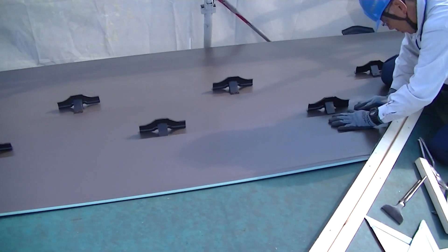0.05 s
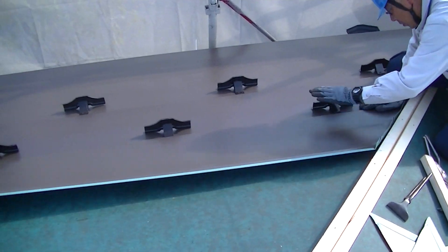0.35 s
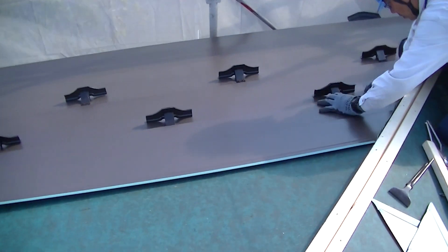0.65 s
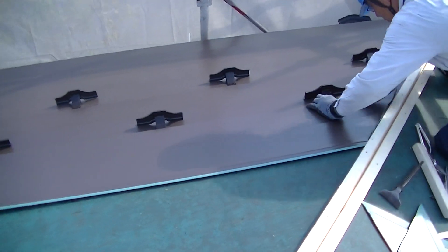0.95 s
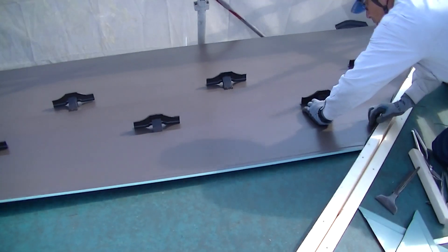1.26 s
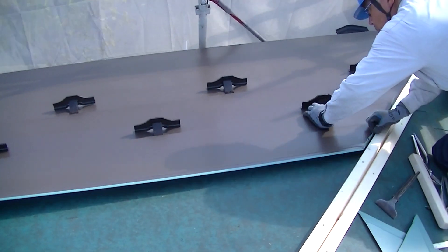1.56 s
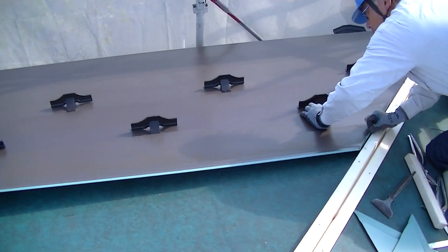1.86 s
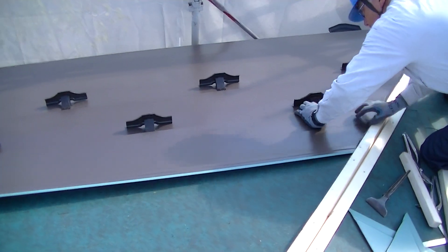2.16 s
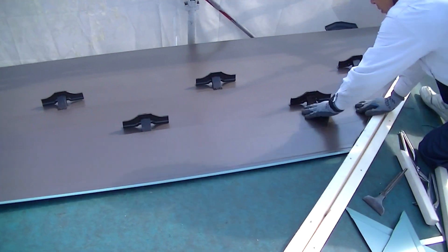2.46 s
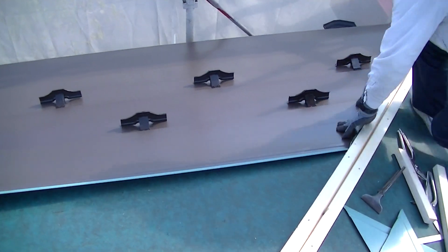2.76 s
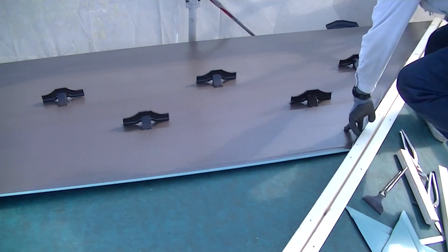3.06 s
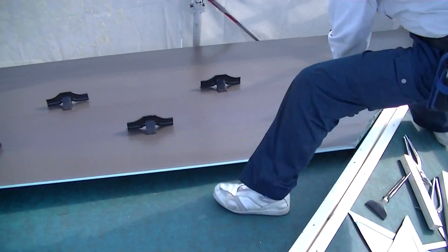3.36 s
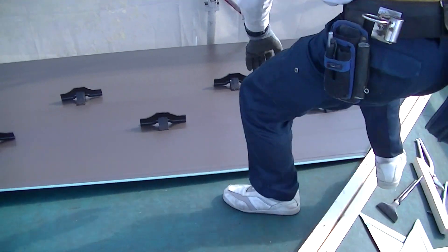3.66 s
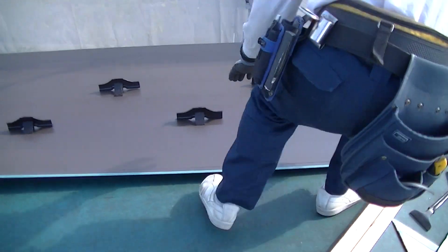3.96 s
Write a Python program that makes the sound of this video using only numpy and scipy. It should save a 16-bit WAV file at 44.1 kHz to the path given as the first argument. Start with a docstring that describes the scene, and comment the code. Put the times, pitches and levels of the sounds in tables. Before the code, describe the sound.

A metal roofing sheet snaps into place twice with sharp, shuddering bangs, scrapes and ticks as it is dragged, then bangs a third time. It clatters again before footsteps and jingling tools, close by outdoors in faint wind.

```python
"""A long metal roofing sheet is pushed into place on a roof, close by, in faint wind.
A knee thuds on the deck and the sheet snaps home twice: each time its edge clacks, then the whole sheet
shudders and rings out. Dragged over the felt, it drones, scrapes and ticks, squeaks and bows, and snaps
home a third time. One more push sets it clattering; at the end the worker steps across, tools jingling."""
import sys
import numpy as np
from scipy import signal
from scipy.fft import rfft, irfft, next_fast_len
from scipy.io import wavfile
from scipy.ndimage import map_coordinates

SR = 44100
rng = np.random.default_rng(int(sys.argv[2]) if len(sys.argv) > 2 else 0)


def int16_out(signal):
    """Quantize to a 16-bit WAV file."""
    q = np.round(np.clip(np.atleast_2d(signal).T, -1, 1) * 32767)
    wavfile.write(sys.argv[1], SR, q.astype(np.int16))


N = 176400

# open-air bed and wind rumble: frequency_hz, level_db
AIR_EQ = [(25, -42), (70, -25), (140, -11), (250, -5), (480, 2), (1000, -4), (2500, -8.5), (4600, -8.5),
          (6000, -14.5), (9500, -19), (16000, -35)]
WIND_EQ = [(20, -8), (70, -6.5), (140, 3), (190, 3.5), (300, -17), (1000, -15), (16000, -70)]
# knees and feet on the deck: start_s, level_db, pitch_hz
THUDS = [(0.024, -40.5, 177), (0.578, -44, 191), (0.848, -48.5, 170), (2.372, -58, 58), (3.323, -56, 171),
         (3.355, -60, 55), (3.938, -52.5, 172)]
# the sheet shudders: start_s, level_db, swell_s, decay_factor, tilt_db_per_octave, held_gain
SHUDDERS = [(.032, -15, 0.051, 0.83, 0.9, 0.29), (.452, -12, 0.096, 0.97, -1.6, 0.28),
            (2.370, -12, 0.053, 0.85, -0.76, 0.22)]
# tone of a shudder: frequency_hz, level_db
SHUDDER_EQ = [(40, -54), (120, -46), (250, -17), (420, -7), (600, -4), (900, -3), (1350, -4.5), (2000, -2),
              (2800, -10), (3700, -10.5), (4900, -6.5), (5700, -13.5), (9000, -11.5), (12500, -22),
              (16000, -33)]
# its tail, before each shudder's decay_factor: frequency_hz, t60_s
SHUDDER_DECAY = [(100, 0.28), (450, 1), (1200, 0.88), (2500, 0.67), (5000, 0.42), (9000, 0.37),
                 (15000, 0.31)]
# resonances of the sheet and of its edge: centre_hz, width_hz, boost_db
SHEET_MODES = [(424, 65, 0.5), (504, 14, 3), (804, 45, 2.5), (949, 21, 6.5), (990, 7.9, 4), (1133, 24, 6.5),
               (1247, 30, 4.5), (1321, 122, 9), (1511, 15, 6), (2077, 34, 4), (3200, 670, 4.5),
               (4246, 140, 7), (4975, 120, 6)]
EDGE_MODES = [(1734, 150, 8), (3120, 180, 4.5), (4550, 400, 5.5)]
# hard hits of the edge: start_s, level_db, pitch_hz, t60_s, boost_at_pitch_db
CLACKS = [(.0320, -16.5, 9400, 0.041, 13), (0.037, -9, 1020, 0.013, 36), (0.0426, -19, 4670, 0.033, 12),
          (0.4518, -13, 3400, 0.018, 0), (0.4535, -8, 1880, 0.014, 19), (.4545, -2, 4450, 0.0064, 14),
          (0.454, -12, 10500, .006, 25), (0.4984, -24.5, 2340, 0.23, 20), (1.8179, -18.5, 1670, 0.041, 25),
          (1.822, -28, 4300, 0.036, 18), (2.369, -28, 5030, 0.03, 4), (2.3735, -3, 5360, 0.0084, 23),
          (2.3743, -11.5, 10600, .008, 21), (2.381, -14, 5030, 0.026, 2), (2.761, -16.5, 4600, 0.025, 28),
          (2.806, -22, 4440, 0.032, 15), (2.8543, -18, 4400, 0.029, 9), (2.8917, -26, 3110, 0.025, 8),
          (3.3268, -20.5, 1500, 0.0092, 16), (3.3636, -15.5, 1610, 0.015, 22),
          (3.3638, -21.5, 3140, .011, 20), (3.3665, -32, 900, 0.026, 11), (3.6004, -24.5, 4270, 0.058, 12),
          (3.612, -29.5, 4600, 0.065, 5)]
# small catches of the edge and taps of tools: start_s, level_db, pitch_hz
TICKS = [(0.328, -38, 4370), (0.373, -35.5, 4600), (0.875, -40.5, 4870), (1.161, -37.5, 11000),
         (1.8623, -37, 11000), (1.1886, -33, 3760), (1.407, -35.5, 3480), (1.4568, -37.5, 3770),
         (1.7162, -39, 4000), (1.735, -41, 6260), (1.7885, -35.5, 6240), (1.8763, -28.5, 4500),
         (1.902, -28, 4320), (1.938, -34, 11000), (2.138, -37, 6470), (2.0345, -37, 5200),
         (2.041, -34, 11000), (2.157, -31, 3720), (2.2673, -35, 3840), (2.012, -33.5, 10500),
         (2.6344, -32, 4600), (2.702, -28.5, 4500), (2.712, -28.5, 11000), (3.2194, -33, 4150),
         (3.5753, -39, 4350), (3.616, -35, 9500), (3.6888, -37, 5200), (3.8143, -44, 3330),
         (3.4192, -33.5, 4550), (3.4886, -34.5, 4400), (3.6648, -31.5, 4400)]
# tone of clacks and ticks: frequency_hz, level_db
CONTACT_EQ = [(50, -59), (250, -10), (500, 5), (1000, 4), (2700, -1), (5000, -3), (5800, -11),
              (9000, -10.5), (13000, -21.5), (16000, -31)]
# fader moves, one list for each push: time_s, drone_db, scrape_db
PUSHES = [
    [(0.22, -47.5, -40), (0.334, -29.5, -34), (0.386, -33.5, -36.5), (0.445, -30.5, -45)],
    [(0.6, -37, -25.5), (0.814, -41.5, -42), (0.874, -65, -44.5), (0.9, -56, -59)],
    [(1.18, -60, -72), (1.192, -49, -40), (1.252, -42, -48), (1.336, -41, -45), (1.354, -41.5, -57),
     (1.41, -37, -41.5), (1.564, -40.5, -50.5), (1.576, -35.5, -43.5), (1.698, -45, -50),
     (1.718, -33, -35.5), (1.742, -33, -45.5), (1.8, -35, -50), (1.82, -35, -18.5), (1.85, -30.5, -29.5),
     (2.082, -32.5, -37.5), (2.36, -36, -40)],
    [(2.6, -41, -35), (2.65, -45, -57), (2.692, -36, -49), (2.716, -29, -30), (2.802, -28.5, -22.5),
     (3.134, -41.5, -34.5), (3.216, -48.5, -47), (3.286, -40.5, -44), (3.368, -31, -36), (3.376, -34, -40),
     (3.456, -37, -39.5), (3.558, -36.5, -57), (3.602, -39, -41), (3.772, -36.5, -35.5), (3.812, -35, -41),
     (3.964, -41.5, -42), (4.0, -60, -45)],
]
# low, middle and high layers of the drag: frequency_hz, level_db
DRONE_EQ = [(40, -87), (120, -33), (240, -13.5), (330, -3), (400, 6.5), (490, 7.5), (600, -1), (900, -4.5),
            (2000, -49), (16000, -90)]
SCRAPE_EQ = [(100, -62), (400, -25), (700, 4), (1300, -3.5), (1900, -3.5), (2700, -15.5), (3800, -19),
             (4800, -18.5), (5800, -25.5), (9000, -26.5), (16000, -46)]
GRIT_EQ = [(500, -21), (2000, -14), (3500, -1), (4600, 23), (5800, -23), (9000, -5), (16000, -14)]
# brushing strokes: start_s, length_s, level_db, tilt_db_per_octave
BRUSHES = [(.22, 0.096, -47, -10), (0.662, 0.39, -54.5, 5.5), (1.325, 0.23, -50.5, -1.5),
           (1.64, 0.097, -51, 1), (1.794, 0.18, -41, -4.5), (2, 0.066, -37.5, -6.5),
           (2.117, 0.038, -35.5, -11), (2.206, 0.032, -40.5, -7.5), (2.625, 0.18, -43, -0.5),
           (2.761, 0.17, -28.5, -6), (3.057, 0.24, -47.5, -3), (3.345, 0.2, -48, -1.5),
           (3.571, 0.14, -41, -5.5), (3.79, 0.1, -38.5, -5)]
# tone of their hiss: frequency_hz, level_db
BRUSH_EQ = [(300, -37), (1500, 4.5), (3000, -0.5), (4000, 1.5), (4700, 5.5), (5700, 0), (9200, 1.5),
            (12000, -6.5), (16000, -20)]
# seam pings and tool jingles: start_s, level_db, pitch_hz, t60_s
CLINKS = [(.515, -24.5, 2560, 0.15), (2.769, -39, 8900, .06), (3.51, -52, 9750, .12),
          (3.6646, -31, 4160, .05), (3.6652, -45, 9900, .05)]
# rubbing squeaks: start_s, length_s, start_hz, end_hz, level_db
SQUEAKS = [(1.287, 0.052, 3750, 3230, -48.5), (1.562, 0.043, 1460, 917, -41.5),
           (2.631, 0.06, 4400, 4180, -40)]
# the sheet bows under a push: start_s, level_db, pitch_hz, swell_s
FLEXES = [(1.895, -26, 754, 0.013), (2.026, -27, 664, 0.0032), (2.08, -22.5, 730, 0.035),
          (2.785, -23, 640, .035), (2.845, -24, 860, .03), (3.06, -30.5, 846, 0.025)]
# tone of the close reflections: frequency_hz, level_db
REFLECTION_EQ = [(250, -13), (500, -1), (1000, -26), (2000, 11.5), (9000, 7.0)]


def amp(db):
    return 10 ** (np.asarray(db) / 20)


def unit_rms(x):
    return x / np.sqrt(np.mean(x ** 2) + 1e-20)


def seconds(samples):
    return np.arange(samples) / SR


def curve_at(points, hz):
    """Read (frequency_hz, value) points on a log frequency axis."""
    knots_hz, values = np.transpose(points)
    return np.interp(np.log(hz + 1), np.log(knots_hz + 1), values)


def boosts(modes, hz):
    """The dB that resonant peaks add to a spectrum."""
    return sum(db / (1 + (2 * (hz - centre) / width) ** 2) for centre, width, db in modes)


def wobble(rate):
    """A smooth random curve, rate knots a second."""
    return map_coordinates(rng.standard_normal(int(N * rate / SR) + 4), [np.arange(N) * rate / SR])


def envelope(t, attack_s, t60_s):
    """A rise into an exponential decay."""
    return (1 - np.exp(-t / attack_s)) * amp(-60 * t / t60_s)


def coloured(x, db_at):
    """x through the EQ db_at(hz), at rms 1."""
    gain = amp(db_at(np.fft.rfftfreq(len(x), 1 / SR)))
    return unit_rms(irfft(rfft(x) * gain, len(x)))


def noise(eq, samples=N):
    """Steady coloured noise at rms 1."""
    return coloured(rng.standard_normal(samples), lambda f: curve_at(eq, f))


def in_sheet(x, eq):
    """x coloured by an EQ and by the sheet's resonances."""
    return coloured(x, lambda f: curve_at(eq, f) + boosts(SHEET_MODES, f))


def low_cut(x, hz, order):
    return signal.sosfilt(signal.butter(order, hz, "highpass", fs=SR, output="sos"), x)


def minimum_phase(db):
    """The response with this dB spectrum that starts abruptly and rings afterwards."""
    cepstrum = irfft(np.log(amp(db)))
    half = len(cepstrum) // 2
    return np.exp(rfft(np.r_[cepstrum[0], 2 * cepstrum[1:half], np.zeros(half)]))


def slips(per_s, scatter_db):
    """Tiny random slips of uneven size."""
    fires = rng.random(N) < per_s / SR
    return fires * rng.standard_normal(N) * amp(scatter_db * rng.standard_normal(N))


def add(track, start_s, sound):
    part = track[max(round(start_s * SR), 0):][:len(sound)]
    part += sound[:len(part)]


def open_air(level_db=-51.5):
    """A quiet, steady outdoor bed."""
    return amp(level_db) * noise(AIR_EQ)


def wind(level_db=-67.5, gust_db=2):
    """A faint rumble that rises and falls with the gusts."""
    return amp(level_db + gust_db * wobble(3.3)) * noise(WIND_EQ)


def deck_thuds(octave_drop_db=5):
    """Knees and feet land on the roof deck with a soft, low boom."""
    out, t = np.zeros(N), seconds(SR // 2)
    for start_s, db, hz in THUDS:
        boom = coloured(rng.standard_normal(len(t)),
                        lambda f: -octave_drop_db * np.log2((f + 1) / hz) ** 2)
        add(out, start_s, amp(db) * boom * envelope(t, attack_s=0.0009, t60_s=0.41))
    return out


def sheet_shudders(treble_lead=0.099, chatter_db=0.5):
    """After each bang the ring starts held down, swells back up, highs slightly sooner, then dies away."""
    out = np.zeros(N)
    for start_s, db, swell_s, decay_factor, tilt_db, held_gain in SHUDDERS:
        wash = in_sheet(slips(per_s=25000, scatter_db=1.5), SHUDDER_EQ)  # the sheet's countless modes
        hz, age_s, bands = signal.stft(wash, SR, nperseg=512)
        hz = hz[:, None]
        pitch_ratio = (hz + 200) / 1500
        rise = 1 - np.exp(-(age_s * pitch_ratio ** treble_lead / swell_s) ** 2)
        swell = held_gain + (1 - held_gain) * rise
        t60_s = decay_factor * curve_at(SHUDDER_DECAY, hz)
        tail = amp(tilt_db * np.log2(pitch_ratio) - 60 * age_s / t60_s)
        ring = signal.istft(bands * swell * tail, SR, nperseg=512)[1][:N]
        add(out, start_s, amp(db + chatter_db * wobble(89.7)) * ring)
    return out


def metal_contact(pitch_hz, t60_s, boost_db, crack_db, width_octaves=0.56, samples=8192):
    """A sharp crack, then a brief clatter in the edge's modes, boosted around its pitch."""
    hz = np.fft.rfftfreq(samples, 1 / SR)
    shape = envelope(seconds(samples), attack_s=0.0005, t60_s=t60_s)
    force = shape * rng.standard_normal(samples)
    force[0] = amp(crack_db) * np.linalg.norm(shape)  # first touch, set against the whole clatter
    bell = np.exp(-.5 * (np.log2((hz + 1) / pitch_hz) / width_octaves) ** 2)
    tone_db = curve_at(CONTACT_EQ, hz) + boosts(EDGE_MODES, hz) + boost_db * bell
    clatter = irfft(rfft(force) * minimum_phase(tone_db))
    return unit_rms(low_cut(clatter, hz=346, order=2)) * np.sqrt(np.mean(shape ** 2))


def clacks_and_ticks():
    """The edge clacks home; small catches and tool taps tick along the way."""
    out = np.zeros(N)
    for start_s, db, hz, t60_s, boost_db in CLACKS:
        add(out, start_s, amp(db) * metal_contact(hz, t60_s, boost_db, crack_db=-9))
    for start_s, db, hz in TICKS:
        add(out, start_s, amp(db) * metal_contact(hz, t60_s=0.051, boost_db=8.5, crack_db=-7))
    return out


def felt_drag(drone_trim_db=-0.5, scrape_trim_db=-2, grit_trim_db=-24.5, fade_db_per_s=189):
    """Slips on the felt keep the pushed sheet droning and scraping; sparse grit rides the scrape."""
    t, drone_fader, scrape_fader = seconds(N), np.zeros(N), np.zeros(N)
    for push in PUSHES:
        time_s, drone_db, scrape_db = np.transpose(push)
        fade_db = fade_db_per_s * np.abs(t - np.clip(t, time_s[0], time_s[-1]))
        drone_fader += amp(np.interp(t, time_s, drone_db) - fade_db)
        scrape_fader += amp(np.interp(t, time_s, scrape_db) - fade_db)
    drone = amp(drone_trim_db) * in_sheet(slips(per_s=12000, scatter_db=0.5), DRONE_EQ)
    scrape = amp(scrape_trim_db) * in_sheet(slips(per_s=9000, scatter_db=0.5), SCRAPE_EQ)
    grit = amp(grit_trim_db) * in_sheet(slips(per_s=300, scatter_db=3), GRIT_EQ)
    return drone_fader * drone + scrape_fader * (scrape + grit)


def brushing(flutter_db=1.5, fade_s=0.022):
    """Gloves, clothes and the sheet's face brush along: strokes of hiss, each with its own brightness."""
    out, t = np.zeros(N), seconds(N)
    hiss = in_sheet(slips(per_s=4000, scatter_db=3), BRUSH_EQ) * amp(flutter_db * wobble(70))
    for start_s, length_s, db, tilt_db in BRUSHES:
        fade_in = (1 + np.tanh((t - start_s) / fade_s)) / 2
        fade_out = (1 + np.tanh((start_s + length_s - t) / fade_s)) / 2
        out += amp(db) * fade_in * fade_out * coloured(hiss, lambda f: tilt_db * np.log2(f + 500))
    return out


def clinks(detune_range=(0.0096, 0.0414), upper_db=-1.5):
    """The seam pings and the tools jingle, each ringing on a close, beating pair of modes."""
    out, t = np.zeros(N), seconds(SR // 2)
    for start_s, db, hz, t60_s in CLINKS:
        upper_hz = hz * (1 + rng.uniform(*detune_range))
        lower = np.sin(2 * np.pi * hz * t)
        upper = amp(upper_db) * np.sin(2 * np.pi * (upper_hz * t + rng.random()))
        add(out, start_s, amp(db) * (lower + upper) * envelope(t, attack_s=0.001, t60_s=t60_s))
    return out


def squeaks(roughness=0.057):
    """Rubbing gives short, falling squeaks, roughened by pitch jitter."""
    out = np.zeros(N)
    for start_s, length_s, start_hz, end_hz, db in SQUEAKS:
        n = int(length_s * SR)
        hz = np.geomspace(start_hz, end_hz, n) * (1 + roughness * wobble(1530)[:n])
        tone = np.sin(2 * np.pi * np.cumsum(hz) / SR)
        add(out, start_s, amp(db) * np.sqrt(2 * np.hanning(n)) * tone)
    return out


def sheet_flexes(octave_drop_db=20):
    """The sheet bows and springs back: a group of its low modes swells and rings out."""
    out, t = np.zeros(N), seconds(SR)
    for start_s, db, hz, swell_s in FLEXES:
        modes = coloured(rng.standard_normal(len(t)),
                         lambda f: boosts(SHEET_MODES, f) - octave_drop_db * np.log2((f + 1) / hz) ** 2)
        add(out, start_s, amp(db) * modes * envelope(t, swell_s, t60_s=0.5))
    return out


def scene(width_db=-24, reflection_t60_s=0.025):
    """The sheet sits centre with little bass; reflections, thuds and wind differ between the ears."""
    mid = open_air() + sheet_shudders() + clacks_and_ticks() + felt_drag()
    mid += brushing() + clinks() + squeaks() + sheet_flexes()
    mid = low_cut(mid, hz=210, order=4)
    t = seconds(SR // 10)
    reflections = noise(REFLECTION_EQ, len(t)) * amp(-60 * t / reflection_t60_s)
    side = amp(width_db) * signal.fftconvolve(mid, reflections / np.linalg.norm(reflections))[:N]
    bass = [deck_thuds() + wind() for ear in range(2)]
    return np.array([mid + side, mid - side]) + bass


def record(dry, ceiling=0.95, top_hz=15800):
    """Soft-clip the highest peaks, thin the deep bass and cut the very top."""
    rounded = dry / (1 + (dry / ceiling) ** 8) ** (1 / 8)
    thinned = low_cut(rounded, hz=102, order=2)
    padded = next_fast_len(N + SR // 2)
    passband = np.fft.rfftfreq(padded, 1 / SR) < top_hz
    return irfft(rfft(thinned, padded) * passband, padded)[:, :N]


dry = scene()
out = record(dry)
int16_out(out)
```